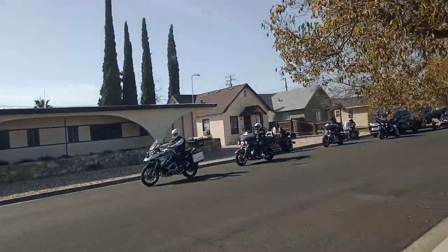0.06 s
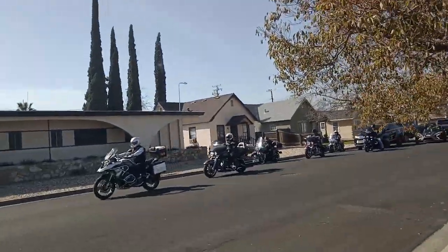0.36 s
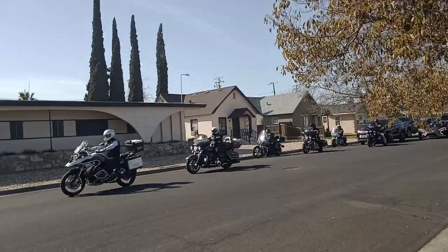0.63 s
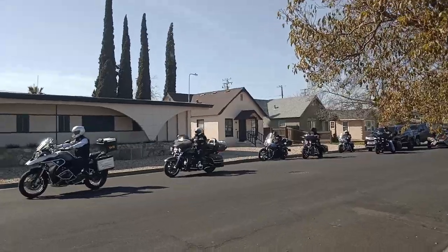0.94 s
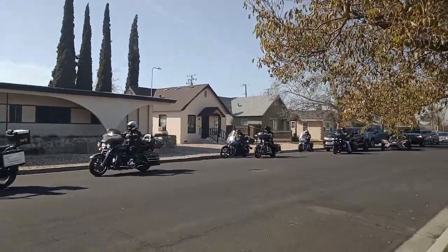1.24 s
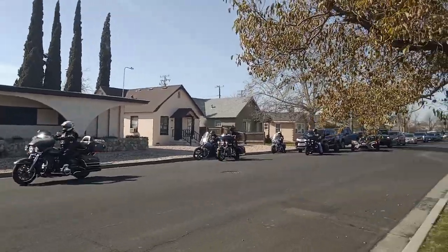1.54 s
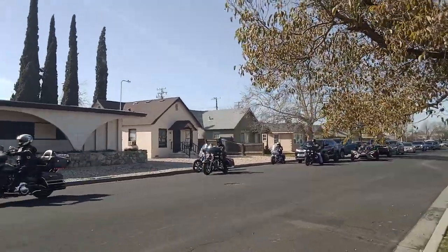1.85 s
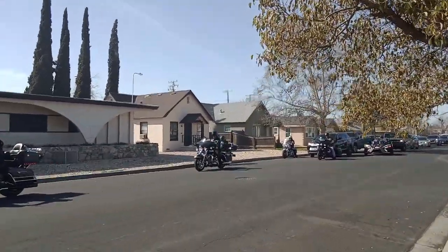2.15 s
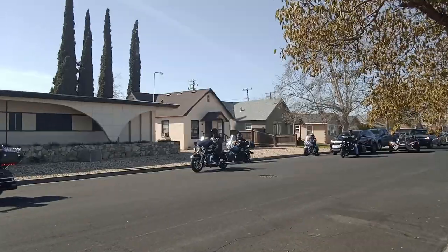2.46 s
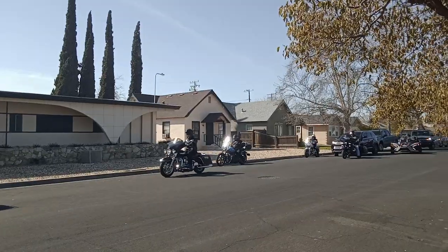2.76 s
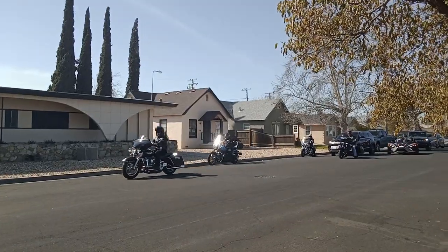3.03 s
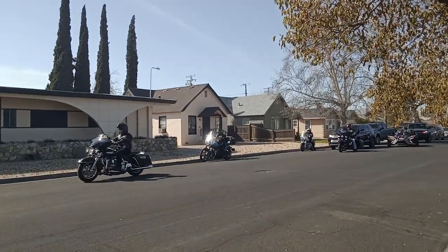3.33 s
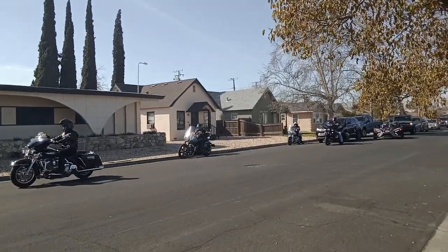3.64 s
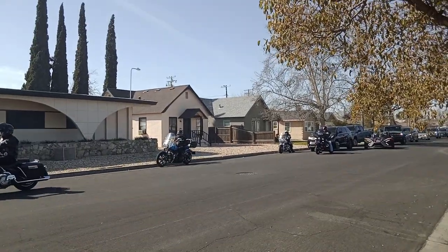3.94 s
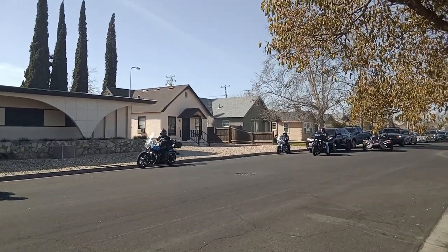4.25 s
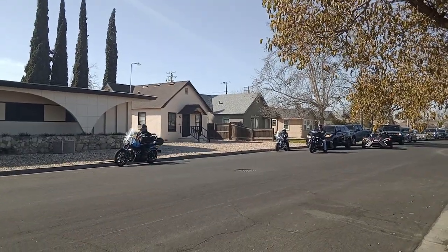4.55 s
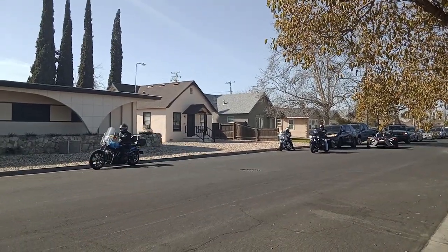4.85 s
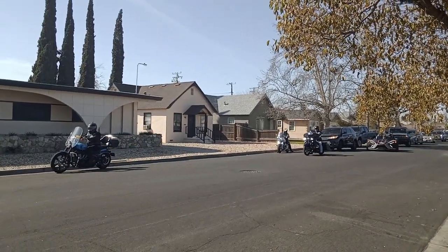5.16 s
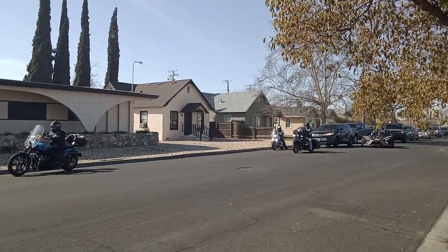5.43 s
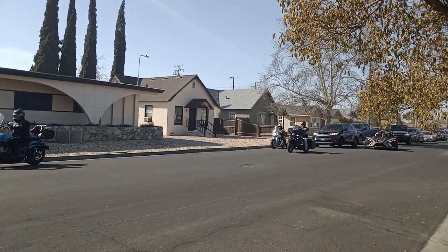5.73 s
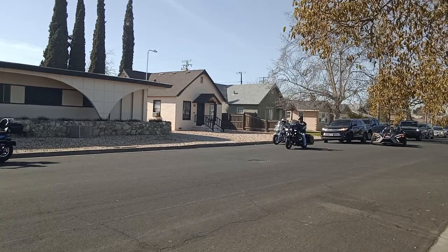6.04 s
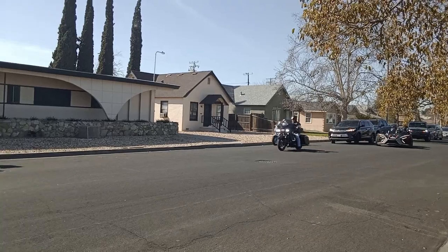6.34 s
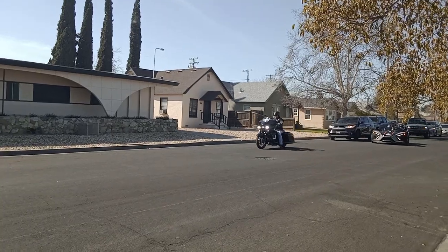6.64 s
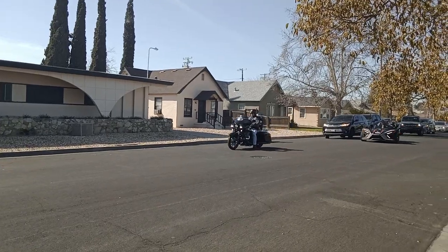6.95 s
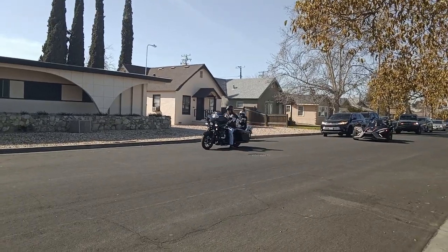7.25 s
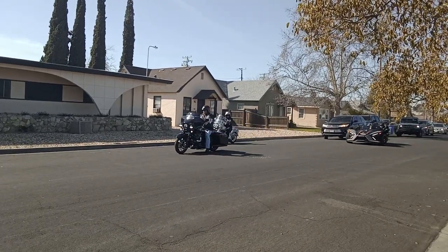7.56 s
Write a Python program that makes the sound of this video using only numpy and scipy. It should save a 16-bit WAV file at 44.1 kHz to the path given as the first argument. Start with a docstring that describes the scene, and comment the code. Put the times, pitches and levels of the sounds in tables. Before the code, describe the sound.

A line of motorcycles rides slowly along a residential street, heard from the roadside. Their engines make a low, uneven rumble with soft exhaust thuds and a light mechanical clatter. About halfway through, one bike passes with a louder, deeper throb, and sharp metallic clacks and ticks start to come through. Near the end another passes with a quick run of high chirps. A faint hiss lies underneath.

```python
"""Motorcycles on a residential street

A line of V-twins rolls slowly past the kerb. Unevenly spaced firings excite the silencers, which lope
and thud, loudest when one tailpipe points at the listener. Impacts ring valve gear and frames, and a
late bike's leaky exhaust joint chirps with each firing. House fronts reverberate the sharp sounds;
underneath lie a steady street hiss and a thin, very high band of microphone hiss."""
import sys
import numpy as np
from scipy import signal
from scipy.fft import rfft, irfft, next_fast_len
from scipy.io import wavfile
from scipy.ndimage import uniform_filter1d, map_coordinates

SR = 44100
rng = np.random.default_rng(int(sys.argv[2]) if len(sys.argv) > 2 else 0)


def transcribe(u):
    """Save the signal u as a 16-bit wav file named by the first command-line argument.

    u: samples, shape (n,) or (channels, n), limited to [-1, 1]; the rate is SR.
    q: integer samples, one column per channel.
    """
    v = np.clip(np.atleast_2d(u).T, -1, 1)
    q = np.round(v * 32767).astype(np.int16)
    wavfile.write(sys.argv[1], SR, q)


N = 343539

# each bike at its closest: t/s, crankshaft f/Hz, its drift/(Hz/s), relative exhaust level/dB
BIKES = [(1.2, 30.2, -.5, -47), (2.1, 24.4, .2, -47), (4.8, 24.9, -.2, -43), (5.4, 22.5, 0, -47),
         (6.85, 25.5, 1.5, -46)]
# course of the engines' midrange: t/s, level/dB
MIDRANGE = [(0.0, -67.5), (1.04, -67.5), (2.1, -65), (2.99, -65.5), (3.43, -67.5), (4.42, -63),
            (4.71, -63.5), (5.88, -64), (6.79, -61), (7.03, -63.5), (7.35, -70), (7.79, -66.5)]
FIRING_PHASES = (0, 315 / 720)  # fractions of a cycle of two crankshaft turns


def amp(db):
    """Amplitude ratio of a level in decibels."""
    return 10 ** (np.asarray(db) / 20)


def unit(x):
    """Normalisation to rms 1."""
    return x / np.sqrt(np.mean(x ** 2) + 1e-20)


def steady(x, size=SR // 3):
    """Division by the running rms removes slow swings and keeps the fast beat."""
    power = uniform_filter1d(uniform_filter1d(x * x, size), size // 2)
    return x / np.sqrt(np.abs(power) + 1e-20)


def along(points, hz):
    """Interpolation of (f/Hz, value) points on a logarithmic frequency axis."""
    f, v = np.transpose(points)
    return np.interp(np.log(hz + 1), np.log(f + 1), v)


def curve(points):
    """Linear interpolation of (t/s, value) points at every sample."""
    return np.interp(np.arange(N) / SR, *np.transpose(points))


def wobble(rate):
    """Slow random modulation: straight lines through rate knots a second."""
    knots = rng.standard_normal(int(N * rate / SR) + 4)
    return map_coordinates(knots, [np.arange(N) * rate / SR], order=1)


def envelope(s, attack, hold, release):
    """Linear rise from time s, a hold, then exponential decay."""
    t = np.arange(N) / SR - s
    return np.clip(t / attack, 0, 1) * np.exp(-np.maximum(t - attack - hold, 0) / release)


def add(track, s, sound):
    """Superposition of a sound on the track at time s."""
    start = max(int(s * SR), 0)
    track[start:start + len(sound)] += sound[:len(track[start:])]


def coloured(x, spectrum):
    """Minimum-phase filtering by a response of (f/Hz, gain/dB) points."""
    size = 2 * next_fast_len(N // 2 + SR // 4)
    cepstrum = irfft(np.log(amp(along(spectrum, np.fft.rfftfreq(size, 1 / SR)))))
    cepstrum[1:size // 2] *= 2
    cepstrum[size // 2 + 1:] = 0
    return irfft(rfft(x, size) * np.exp(rfft(cepstrum)))[:N]


def band_noise(hz, octaves, size):
    """Response of a steep-sided resonance to white noise, at rms 1."""
    offset = np.log2((np.fft.rfftfreq(size, 1 / SR) + 1) / hz) / octaves
    return unit(irfft(rfft(rng.standard_normal(size)) / (1 + offset ** 2) ** 2, size))


def patchy(x, depth_db):
    """Interference of moving reflections, imitated by random gains in narrow bands."""
    z = signal.stft(x, nperseg=1024)[2]
    field = uniform_filter1d(rng.standard_normal(z.shape), size=4, axis=0)
    field = uniform_filter1d(field, size=9, axis=1)
    return signal.istft(z * amp(depth_db * unit(field)), nperseg=1024)[1][:N]


def ride(bike, lane_m=5.53, road_m_per_s=8.25):
    """Crankshaft f/Hz and level/dB of a passing bike; spherical spreading sets the level."""
    s, crank_hz, drift, db = bike
    t = np.arange(N) / SR - s
    return crank_hz + drift * t, db - 20 * np.log10(np.hypot(1, road_m_per_s * t / lane_m))


def firings(scatter_db, jitter_s):
    """Impulse excitation by all engines: a V-twin fires after 315, then 405 degrees."""
    pulses = np.zeros(N)
    for crank_hz, near_db in map(ride, BIKES):
        cycle = np.cumsum(crank_hz) / SR / 2 + rng.random()
        for offset in FIRING_PHASES:
            at = np.flatnonzero(np.diff(np.floor(cycle - offset)))
            late, strength = rng.standard_normal((len(at), 2)).T
            at = np.clip(at + (late * jitter_s * SR).astype(int), 0, N - 1)
            pulses[at] += amp(near_db[at] + scatter_db * strength)
    return pulses


def puffs(pulses, decay_s, floor):
    """Amplitude modulation: noise flares at each pulse above a steady floor."""
    gate = signal.lfilter([1], [1, -np.exp(-1 / (decay_s * SR))], pulses)
    return steady((steady(gate) + floor) * rng.standard_normal(N))


def pings(pulses, low_hz, high_hz, t60, scatter_db, count):
    """Damped free vibration: each firing rings count small parts at random pitches."""
    at = np.repeat(np.flatnonzero(pulses), count)
    pitch, late, phase = rng.random((3, len(at), 1))
    t = np.arange(SR // 20) / SR
    hz = low_hz * (high_hz / low_hz) ** pitch
    strength = pulses[at, None] * amp(scatter_db * rng.standard_normal((len(at), 1)))
    shape = amp(-60 * t / t60) * (1 - np.exp(-t / 0.0004))
    rings = strength * shape * np.sin(2 * np.pi * (hz * t + phase))
    where = at[:, None] + (late ** 2 * .007 * SR).astype(int) + np.arange(len(t))
    return steady(np.bincount(where.ravel(), rings.ravel(), N)[:N], size=SR // 2)


def orders(crank_hz, levels, rough):
    """Phase-modulated tones at (crankshaft order, relative level/dB), together at rms 1."""
    turns = np.cumsum(crank_hz) / SR
    return unit(sum(amp(db) * np.sin(2 * np.pi * (order * turns + rng.random()) + rough * wobble(14))
                    for order, db in levels))


def background_hiss():
    """Noise floor: nearly steady street hiss with a thin, very high band of microphone hiss."""
    # hiss spectrum: f/Hz, relative level/dB
    spectrum = [(2500, -38.5), (4200, 2), (5000, -13.5), (6300, -4), (7000, -8.5), (8000, -21),
                (9700, -21.5), (11000, -27.5), (13500, -27.5), (15300, -15)]
    midrange_db = curve(MIDRANGE)
    level = amp(-76 + 0.23 * (midrange_db - midrange_db.mean()))
    return level * unit(patchy(coloured(rng.standard_normal(N), spectrum), depth_db=4.5))


def house_echo(x):
    """Diffuse reflection from house fronts; the treble decays first."""
    # reverberation time: f/Hz, t60/s
    decay_times = [(100, 0.21), (1500, 0.18), (8000, 0.03)]
    hz, t, z = signal.stft(rng.standard_normal(SR // 2), SR, nperseg=256)
    tail = signal.istft(z * amp(-60 * t / along(decay_times, hz)[:, None]), SR, nperseg=256)[1]
    return signal.fftconvolve(np.pad(x, (SR // 80, 0)), tail / np.linalg.norm(tail))[:N]


def ticks(pulses, from_s=3.55, rise_s=0.54):
    """Firings excite faint high modes and a sizzle, which grow with the later bikes."""
    level = amp(-75.5) * np.clip((np.arange(N) / SR - from_s) / rise_s, .15, 1)
    brightness = [(5000, 20), (7000, 7.5), (10000, -5.5), (11000, -5.5), (15000, -16)]
    sharp = unit(pulses ** 1.17)
    rings = pings(sharp, low_hz=5550, high_hz=13970, t60=0.033, scatter_db=2.0, count=16)
    sizzle = coloured(puffs(sharp, decay_s=0.0046, floor=.15), [(4000, -21.5), (6000, -2.5)])
    return level * unit(coloured(rings + 0.36 * sizzle, brightness))


def resonances(pulses):
    """Resonant episodes: pipes and panels drone or rasp, and brakes squeal faintly at 4.4 to 5.5 kHz; all of
    them pulse with the firings."""
    # resonant episodes: t/s, duration/s, f/Hz, nominal width/octaves, relative level/dB
    episodes = [(0.802, .39, 4530, 0.018, -80), (1.426, 0.15, 5500, 0.012, -77),
                (1.64, 0.21, 4440, 0.014, -73.5), (2.3, 0.36, 172.2, 0.032, -46),
                (2.398, 0.35, 1305, 0.057, -66.5), (4.208, 0.59, 319, 0.16, -54.5),
                (6.583, 0.21, 599, 0.057, -56), (6.916, 0.1, 4800, 0.78, -57)]
    out = np.zeros(N)
    for s, length, hz, octaves, db in episodes:
        size = int(length * SR)
        add(out, s, amp(db) * signal.windows.tukey(size, .5) * band_noise(hz, 1.5 * octaves, size))
    t = np.arange(SR // 10) / SR
    beat = steady(signal.fftconvolve(pulses, t * np.exp(-t / 0.0064))[:N])
    return coloured(out * (.5 + 0.43 * beat), [(6500, -0.5), (8500, -19.5)])


def valve_clatter(pulses):
    """Impact noise of tappets and loose metal, more distinct as the bikes grow louder."""
    # valve gear response: f/Hz, gain/dB
    response = [(650, -32), (1100, -8), (1500, -1.5), (1850, 2), (2300, -1), (2600, -7), (3800, -5),
                (4900, -7), (5900, -6.5), (7000, -19.5), (11000, -49)]
    midrange_db = curve(MIDRANGE)
    crisp_share = np.clip(0.32 + 0.08 * (midrange_db - midrange_db.mean()), .05, 1)
    rings = pings(pulses ** 0.84, low_hz=1154.3, high_hz=6933, t60=0.085, scatter_db=5.0, count=20)
    chatter = unit(rings + 0.55 * puffs(pulses, decay_s=0.016, floor=.03))
    blur = patchy(rng.standard_normal(N), depth_db=2.5)
    clatter = np.sqrt(crisp_share) * chatter + np.sqrt(1 - crisp_share) * blur
    return amp(midrange_db - 1) * unit(coloured(clatter, response))


def clacks(rebound_s=0.014, rebound_db=-10):
    """Struck metal rings in inharmonic modes and rebounds once; higher-pitched parts decay sooner."""
    # knocks on frames and gearboxes: t/s, relative level/dB, main mode f/Hz
    knocks = [(1.7738, -56, 1810), (2.866, -57, 2280), (3.7857, -50.5, 1590), (3.8645, -51.5, 1530),
              (3.87, -42, 6100), (4.077, -48, 6240), (4.173, -53.5, 1970), (4.554, -52, 1870),
              (4.634, -48.5, 1860), (4.714, -51.5, 6200), (5.5538, -54, 2250), (5.6376, -50, 2210),
              (6.0925, -51, 1830), (6.5465, -48, 1920), (6.5827, -44, 1326), (6.801, -47, 1750),
              (6.8303, -46, 1910), (6.9345, -42, 4270), (7.28, -43.5, 6570), (7.3234, -37, 4460),
              (7.5797, -54, 3990)]
    modes = [(.52, -12.5), (1, 2), (1.4, -8)]  # frequency ratio, gain/dB
    out, t = np.zeros(N), np.arange(SR // 10) / SR
    attack = 1 - np.exp(-t / 0.00058)
    for s, db, hz in knocks:
        t60 = 0.064 * np.sqrt(1900 / hz)
        for late, loss_db in [(0, 0), (rebound_s, rebound_db)]:
            ring = sum(amp(gain) * band_noise(hz * ratio, 0.12, len(t)) for ratio, gain in modes)
            crack = 0.57 * amp(-60 * t / 0.02) * band_noise(4000, octaves=1.0, size=len(t))
            add(out, s + late, amp(db + loss_db - 8) * attack * (amp(-60 * t / t60) * ring + crack))
    return coloured(out, [(6700, 3), (8000, -13)])


def chirp(hz):
    """Flow noise of escaping gas: a snap, then three unsteady whistle tones in a spit of noise."""
    t = np.arange(SR // 16) / SR
    turns = np.cumsum(hz * (1 + 0.03 * np.exp(-t / 0.0059))) / SR
    ratios = np.array([1.07, .98, .80]) * (1 + 0.047 * rng.standard_normal(3))
    waver = 0.014 * np.cumsum(rng.standard_normal((3, len(t))), axis=1)
    tones = np.sin(2 * np.pi * (np.outer(ratios, turns) + waver))
    whistle = amp(4.4 * rng.standard_normal(3) - 4.5) @ tones
    spit = 0.58 * band_noise(0.75 * hz, octaves=0.36, size=len(t))
    snap = .06 * amp(-60 * t / 0.011) * band_noise(11500, octaves=0.97, size=len(t))
    return amp(-60 * t / 0.031) * (1 - np.exp(-t / 0.0019)) * (whistle + spit) + snap


def leaky_joint(crank_hz=22.02, whistle_hz=8170, sag_db_per_s=5.5):
    """Pulsed flow through a leaky exhaust joint: in a bout, one chirp to each uneven firing."""
    # bouts of chirping: t/s, duration/s, initial level/dB
    bouts = [(6.7364, .57, -47.5), (7.65, .07, -53)]
    out = np.zeros(N)
    beats = np.add.outer(np.arange(10), FIRING_PHASES).ravel() * 2 / crank_hz
    for s, length, db in bouts:
        for late in beats[beats < length]:
            hz = whistle_hz * (1 + .035 * rng.standard_normal())
            add(out, s + late, amp(db - sag_db_per_s * late) * chirp(hz))
    return out


def rasps(pulses):
    """Flow noise, modulated by the firings, is heard while a tailpipe sweeps past."""
    # tailpipe sweeps: t/s, hold/s, level/dB
    sweeps = [(4.161, 0.18, -56.5), (6.55, 0.06, -58.5)]
    # rasp spectrum: f/Hz, relative level/dB
    spectrum = [(130, -7), (260, 8), (340, 3.5), (430, -8.5), (590, 7), (700, -7), (850, 5), (1000, 2),
                (1170, -2.5), (1450, -11.5), (2300, -7), (3200, -29), (8000, -60)]
    level = sum(amp(db) * envelope(s, attack=0.023, hold=hold, release=0.043) for s, hold, db in sweeps)
    return level * unit(coloured(puffs(pulses, decay_s=.02, floor=1.7), spectrum))


def thuds():
    """Transient response: an overfed firing swells the silencer for a few low cycles."""
    # heavy firings: t/s, relative level/dB, f/Hz
    heavy_firings = [(0.021, -35, 69), (0.26, -40, 79.5), (0.849, -37.5, 70.6), (1.384, -31.5, 105.3),
                     (1.755, -31, 90.4), (2.434, -39, 120), (2.49, -38, 66.4), (4.231, -27.5, 111),
                     (4.395, -26.5, 102), (5.472, -35, 98), (5.842, -38.5, 81.5), (6.65, -35.5, 61),
                     (6.773, -37, 122), (6.824, -37, 114)]
    out, t = np.zeros(N), np.arange(SR // 10) / SR
    rise = t / 0.012
    swell = (rise * np.exp(1 - rise)) ** 3
    for s, db, hz in heavy_firings:
        add(out, s, amp(db + 4.5) * swell * np.sin(2 * np.pi * hz * t))
    return out


def exhausts(pulses):
    """Source and filter: firings boom through silencers, with droning orders and a rush of gas."""
    # silencer response: f/Hz, gain/dB
    silencer = [(24, -40), (38, -13), (54, -2.5), (105, 1), (135, -2), (180, -7), (250, -17), (330, -22.5),
                (430, -29.5), (700, -73.5)]
    # spectrum of the outflowing gas: f/Hz, relative level/dB
    outflow = [(200, -6), (380, 0), (500, 2.5), (660, 3.5), (880, -5.5), (1250, -7), (1700, -25.5),
               (3000, -63)]
    drone_orders = [(3.5, -7), (4, -0.5), (7, -12)]
    rides = [ride(bike) for bike in BIKES]
    rest_of_line = amp(-47 - 2.03 * np.arange(N) / SR)  # fades as the line thins out
    level = np.sqrt(rest_of_line ** 2 + sum(amp(db) ** 2 for _, db in rides))  # powers add
    blows = steady(pulses) + 0.96 * puffs(pulses, decay_s=0.073, floor=0.6)
    boom = steady(coloured(blows, silencer), size=SR // 6)
    drone = steady(sum(amp(db) * orders(crank_hz, drone_orders, rough=0.13) for crank_hz, db in rides))
    rush = patchy(coloured(puffs(pulses, decay_s=0.018, floor=1.8), outflow), depth_db=2.5)
    return level * (0.92 * boom + 0.61 * drone) + amp(curve(MIDRANGE)) * unit(rush)


def tailpipe_surge(start_s=4.38, sag_db_per_s=7.5, lope_db=2.5):
    """Directivity: the third bike's low orders are strong on its pipe's axis, sagging as it leaves."""
    # on-axis spectrum: crankshaft order, relative level/dB
    on_axis = [(1.5, -17), (2, -6.5), (2.5, 2), (3, -12), (3.5, -3.5), (4, -1), (4.5, -1), (5, -4),
               (7.5, -17.5), (10, -23.5), (13.5, -25)]
    crank_hz, _ = ride(BIKES[2])
    level = amp(-31.5 - sag_db_per_s * (np.arange(N) / SR - start_s))
    aim = envelope(start_s, attack=0.027, hold=.44, release=0.086)
    throb = steady(orders(crank_hz, on_axis, rough=0.27), size=SR // 25)
    return level * aim * throb * amp(lope_db * wobble(22))


def scene():
    """Superposition of all sources; only the sharp sounds feed the echo."""
    pulses = unit(firings(scatter_db=3.5, jitter_s=0.00028))
    sharp = clacks() + leaky_joint() + ticks(pulses)
    pipes = exhausts(pulses) + tailpipe_surge() + thuds() + rasps(pulses)
    metal = valve_clatter(pulses) + resonances(pulses)
    return (pipes + metal + sharp + amp(-13) * house_echo(sharp) + background_hiss())[None]


def record(dry, top_hz=15800):
    """Band limiting by an ideal low-pass filter."""
    size = next_fast_len(N + SR // 4)
    return irfft(rfft(dry, size) * (np.fft.rfftfreq(size, 1 / SR) < top_hz), size)[:, :N]


dry = scene()
out = record(dry)
transcribe(out)
```